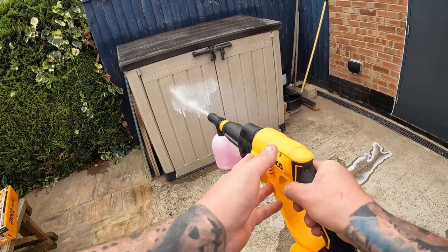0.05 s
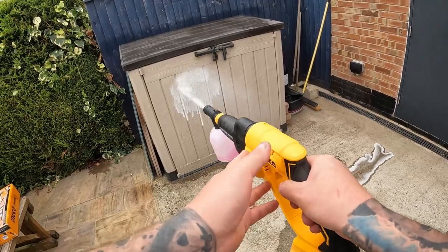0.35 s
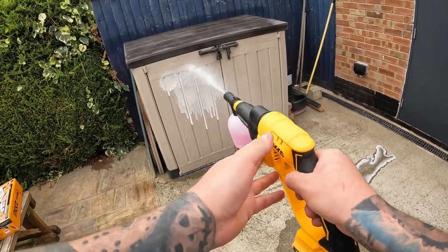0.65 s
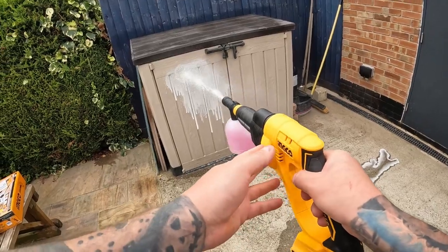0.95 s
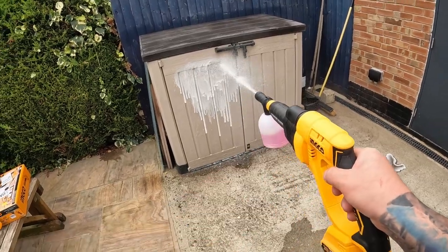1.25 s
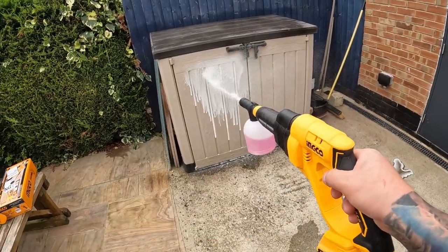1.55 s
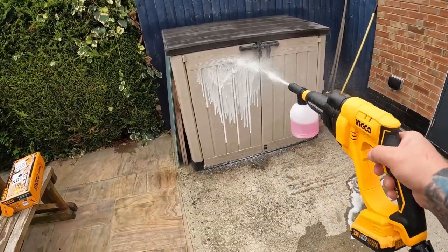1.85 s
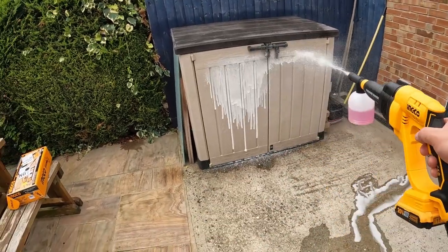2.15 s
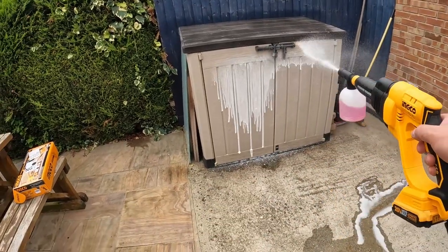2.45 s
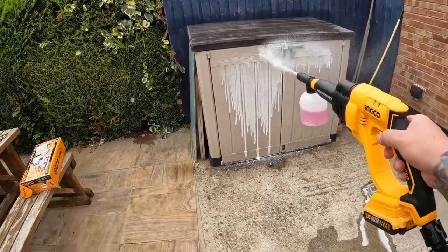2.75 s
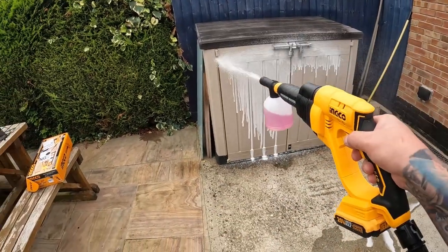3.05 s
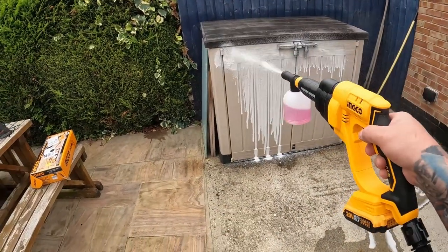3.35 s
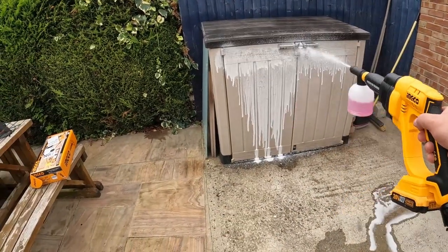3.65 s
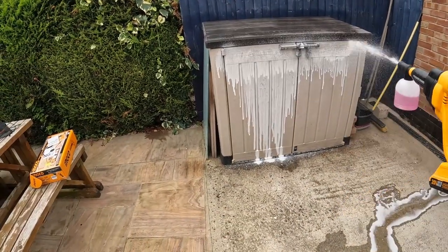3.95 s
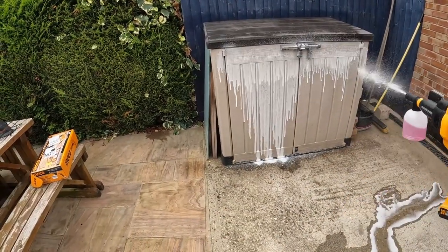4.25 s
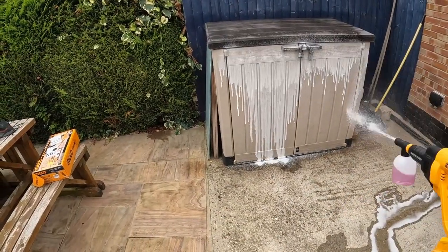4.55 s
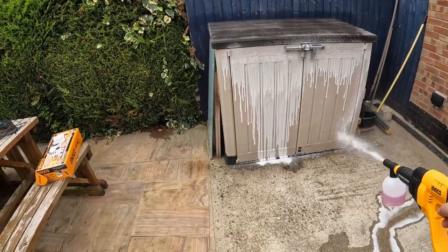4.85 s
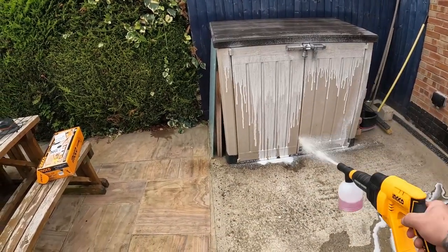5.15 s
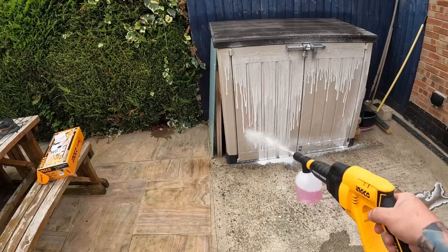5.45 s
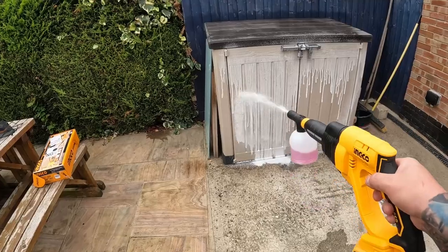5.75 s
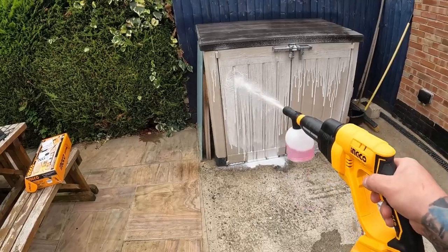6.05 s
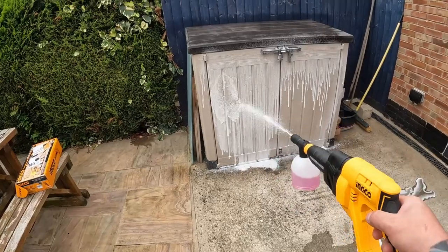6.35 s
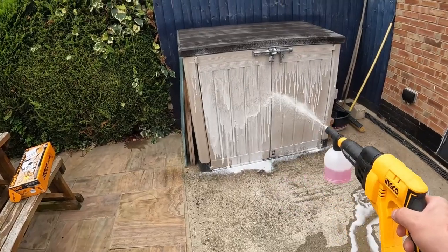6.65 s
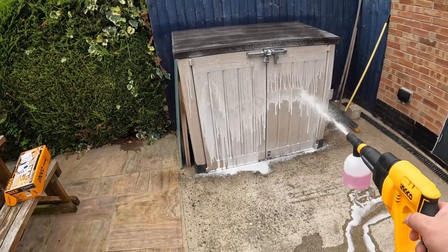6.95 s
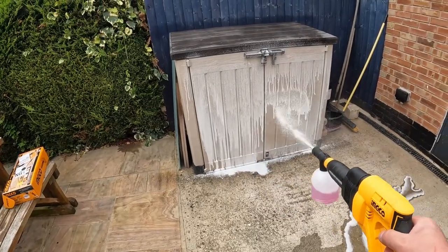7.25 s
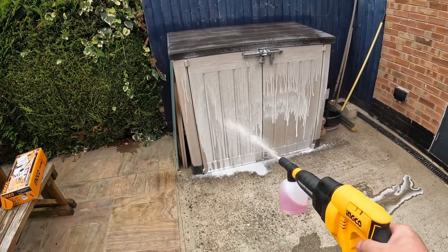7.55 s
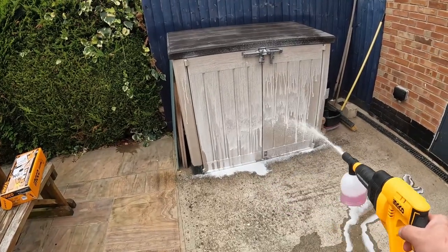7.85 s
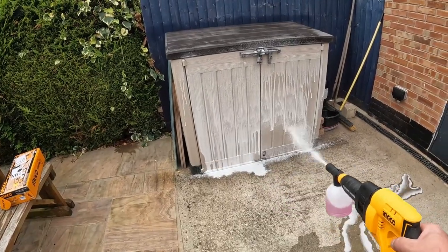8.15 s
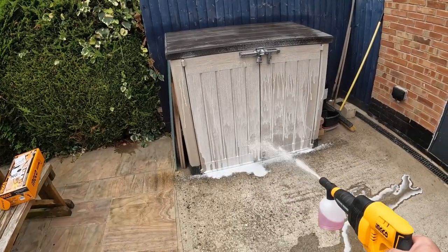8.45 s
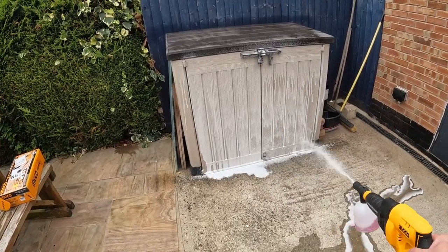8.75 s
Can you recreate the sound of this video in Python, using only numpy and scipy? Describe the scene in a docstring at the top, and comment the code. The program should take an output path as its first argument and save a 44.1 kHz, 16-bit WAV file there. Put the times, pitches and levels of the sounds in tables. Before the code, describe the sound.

A battery-powered pressure washer runs without a break, close to the microphone in a small yard. Its pump makes a fast, rattling buzz under a high gear whine, while the jet hisses and fizzes and drops patter on hollow plastic cabinet doors. The hiss shifts in brightness as the spray sweeps around. Faint wind rumble and a few dull handling thumps sit underneath.

```python
"""Foaming a cabinet with a pressure washer

A cordless pressure washer, held at arm's length, sprays foam on a plastic cabinet in a small yard.
Its piston knocks twice per crank turn, and its gears whine and ring the case. The jet hisses in time
with the strokes and drops patter on the doors. Light wind and a few dull handling thumps reach the
two microphone ports."""
import sys
import numpy as np
from scipy import signal
from scipy.fft import rfft, irfft
from scipy.io import wavfile
from scipy.ndimage import uniform_filter1d

SR = 44100
rng = np.random.default_rng(int(sys.argv[2]) if len(sys.argv) > 2 else 0)


def transcribe(signal):
    """Save signal, clipped to [-1, 1], as a 16-bit WAV file at the path in sys.argv[1]."""
    frames = np.atleast_2d(signal).T
    limited = np.clip(frames, -1, 1)
    pcm = np.round(limited * 32767).astype(np.int16)
    wavfile.write(sys.argv[1], SR, pcm)


N = 397341
TIME = np.arange(N) / SR
FREQS = np.fft.rfftfreq(N, 1 / SR)


def undb(db):
    """Turn decibels into a gain to multiply by."""
    return 10 ** (np.asarray(db) / 20)


def unit(x):
    """Scale a signal to an average strength (rms) of 1."""
    return x / np.sqrt(np.mean(x ** 2))


def over_time(table):
    """Join (time_s, value) points into one value per sample."""
    return np.interp(TIME, *np.transpose(table))


def over_pitch(table):
    """Join (pitch_hz, value) points into one value per frequency."""
    hz, value = np.transpose(table)
    return np.interp(np.log(FREQS + 1), np.log(hz), value)


def filtered(x, response):
    """Turn each frequency up or down by its response."""
    return irfft(rfft(x) * response, N)


def coloured(x, tone):
    """Shape a sound with a (pitch_hz, level_db) table; strength 1."""
    return unit(filtered(x, undb(over_pitch(tone))))


def resonance(freqs, hz, width_hz):
    """How strongly something that rings at hz answers each frequency."""
    return 1j * freqs * width_hz / (hz ** 2 - freqs ** 2 + 1j * freqs * width_hz)


def ringing(x, hz, width_hz):
    """Make x ring at a pitch that can move; strength 1."""
    carrier = np.exp(2j * np.pi * np.cumsum(hz) / SR)
    slow = signal.sosfilt(signal.butter(2, width_hz / 2, fs=SR, output="sos"), x / carrier)
    return unit(np.real(slow * carrier))


def noise():
    """Plain white noise."""
    return rng.standard_normal(N)


def wander(rate_hz):
    """A smooth random wobble of strength 1."""
    return unit(filtered(noise(), 1 / (1 + (FREQS / rate_hz) ** 4)))


def after(time_s, ramp_s=0.34):
    """Go from 0 to 1 around time_s; the usual ramp is one move of the arm."""
    return np.clip((TIME - time_s) / ramp_s + .5, 0, 1)


def bump(middle_s, half_s):
    """A smooth rise and fall, 1 at its middle."""
    return np.exp(-.5 * ((TIME - middle_s) / half_s) ** 2)


def swells(table, column=0):
    """Add up brief level changes in dB; column 0 is the table's first gain."""
    return sum(gains_db[column] * bump(middle_s, half_s) for middle_s, half_s, *gains_db in table)


def strokes(turn, place):
    """Swing between 1 and -1 twice per crank turn, peaking at place (0 to 1)."""
    return np.cos(4 * np.pi * (turn - place))


def piston_load(turn, place, stroke_db=9.0, forward_db=1.0):
    """The load peaks twice a turn; forward_db lifts the second peak and lowers the first."""
    return unit(undb(stroke_db * strokes(turn, place) - forward_db * np.cos(2 * np.pi * (turn - place))))


def blows(turn, places, forces, scatter_db, jitter_s):
    """Taps that come back at the same places in every turn, no two quite alike."""
    out, turns = np.zeros(N), np.arange(int(turn[-1]))
    late, size = rng.standard_normal((2, len(places), len(turns)))
    due_s = np.interp(turns + places[:, None], turn, TIME)
    at = np.clip((due_s + jitter_s * late) * SR, 0, N - 2)
    gain = forces[:, None] * undb(scatter_db * size)
    # each tap is shared between the two nearest samples
    np.add.at(out, at.astype(int), gain * (1 - at % 1))
    np.add.at(out, at.astype(int) + 1, gain * (at % 1))
    return out


def rattle(turn, count=132):
    """Gear teeth and seals tick in a pattern that repeats every turn."""
    places = (np.arange(count) + rng.random(count)) / count
    return unit(blows(turn, places, rng.choice([-1, 1], count), scatter_db=2, jitter_s=7e-6))


def drops(spread_db=4.0):
    """A dense stream of tiny impacts of uneven size."""
    return noise() * undb(spread_db * np.clip(noise(), -2, 2))


# Tone of the yard: pitch_hz, level_db
YARD_TONE = [(20, -12), (70, 7), (130, -7), (300, 2.5), (700, -28), (3000, -37)]

def yard():
    """A faint, steady outdoor rumble."""
    return undb(-58) * coloured(noise(), YARD_TONE)


# Low gusts of wind and short, dull handling thumps: middle_s, half_length_s, level_db
GUSTS_AND_THUMPS = [(0.115, 0.045, -51), (0.315, 0.018, -41.5), (0.872, 0.015, -35), (0.99, 0.32, -52),
                    (1.5, 0.1, -43.5), (1.76, 0.017, -28), (1.79, 0.028, -34), (2.248, .03, -47),
                    (4.516, 0.078, -52.5), (5.45, 0.055, -43.5), (5.897, 0.022, -38.5), (5.98, .05, -45),
                    (6.6, 0.26, -62), (7.3, 0.057, -55), (8.8, 0.34, -49)]
# Tones of the wind and of the thumps: pitch_hz, level_db
WIND_TONE = [(10, -3.5), (25, 1), (45, -1.5), (80, -7), (150, -31), (400, -48)]
THUMP_TONE = [(20, -10), (65, 7), (150, -6), (300, -34), (800, -50)]

def wind_and_thumps(breeze_db=-64.5, thump_half_s=0.017):
    """Wind rumbles on both microphone ports, partly alike, and handling adds short, dull thumps."""
    wind_gain, thump_gain = undb(breeze_db + wander(6)), 0
    for middle_s, half_s, db in GUSTS_AND_THUMPS:
        swell = undb(db) * bump(middle_s, half_s)
        thump_share = 1 / (1 + (half_s / thump_half_s) ** 4)  # larger for shorter events
        wind_gain = wind_gain + (1 - thump_share) * swell
        thump_gain = thump_gain + thump_share * swell
    shared = coloured(noise(), WIND_TONE)
    rumble = np.array([shared + 0.64 * coloured(noise(), WIND_TONE) for _ in range(2)])
    return wind_gain * rumble + thump_gain * coloured(noise(), THUMP_TONE)


# Where the jet points: time_s, height (0 foot of the doors, 1 top)
AIM = [(0.0, 0.66), (1.3, 0.79), (2.0, 0.86), (2.45, 0.74), (3.2, 0.96), (4.1, 0.65), (5.35, 0.17),
       (5.9, 0.74), (6.9, 0.6), (7.3, 0.39), (7.7, 0.45), (8.05, 0.27), (8.45, 0.23), (8.85, 0.34)]

def aim_height():
    """The jet sweeps up and down the doors."""
    return over_time(AIM)


HAND_OFF_S = 1.17

def hand_on():
    """1 while a second hand steadies the housing, then 0."""
    return 1 - after(HAND_OFF_S, ramp_s=0.093)


# The jet slips off the doors onto the paving: start_s, end_s
MISSES = [(4.55, 5.4), (8.62, 11)]
SECOND_COAT_S, ASIDE_START_S, ASIDE_END_S = 5.4, 3.75, 4.52

def level(db, high_db=0, hand_db=0, foam_db=0, miss_db=0, aside_db=0):
    """A layer's level in dB, plus what each way of holding and aiming the gun adds."""
    on_foam = after(SECOND_COAT_S)  # the jet runs back over its own foam
    missing = sum(after(start_s) - after(end_s) for start_s, end_s in MISSES)
    aside = after(ASIDE_START_S) - after(ASIDE_END_S)  # the gun is held out to the side
    return (db + high_db * aim_height() + hand_db * hand_on()
            + foam_db * on_foam + miss_db * missing + aside_db * aside)


# The jet finds a loose spot on a door: middle_s, half_length_s, gain_db
LOOSE_SPOTS = [(2.6, 0.37, 2), (7.05, .07, 3.5), (7.65, 0.12, 5), (8.42, 0.13, 6)]

def doors(turn, pitch_hz=915, width_hz=105):
    """Each slug of water thumps the hollow plastic doors."""
    drum_db = level(-43.5, hand_db=-2.5, foam_db=-1) + swells(LOOSE_SPOTS)
    slugs = noise() * undb(1.1 * strokes(turn, place=0.17))
    return undb(drum_db) * unit(filtered(slugs, resonance(FREQS, pitch_hz, width_hz) ** 2))


# Tones of the bright wash and the lower splash: pitch_hz, level_db
WASH_TONE = [(3500, -27), (4600, -10), (4950, 2), (5900, 1), (7000, -19), (9000, -37)]
SPLASH_TONE = [(400, -5), (1200, -4), (2200, 8), (2600, -2), (3200, -2.5), (3850, 7), (4400, -5.5),
               (6000, -15)]

def patter(surge_db):
    """Drops land as a pulsing wash and an even splash."""
    wash_db = level(-53, high_db=10, hand_db=-2, foam_db=-2, miss_db=3.5)
    splash_db = level(-41.5, high_db=-8, hand_db=-1, miss_db=3, aside_db=-1)
    wash = coloured(drops() * undb(surge_db), WASH_TONE)
    splash = coloured(drops(), SPLASH_TONE)
    return undb(wash_db) * wash + undb(splash_db) * splash


# Tone of the mist: pitch_hz, level_db
MIST_TONE = [(2000, -8), (3700, -5), (4400, -15.5), (7900, 1), (8900, -6.5), (10300, 1.5), (10900, -6),
             (11300, -0.5), (11800, -8), (12700, -6.5), (13800, -10.5), (15000, -37), (16000, -29)]
# The finest hiss swells: middle_s, half_length_s, gain_db
MIST_SWELLS = [(1.3, 0.17, 2.5), (7.0, 0.064, 2)]

def mist(turn, splutter):
    """The finest drops mingle with the ticking of the pump."""
    mist_db = level(-42, high_db=-0.5, hand_db=1.5, foam_db=1.5, miss_db=-1) + swells(MIST_SWELLS)
    puff_db = 2 * strokes(turn, place=0.26) + 2 * np.cos(2 * np.pi * (turn - .85)) + 1.7 * splutter
    ticks = unit(drops(spread_db=6.8)) + undb(1.5) * rattle(turn)
    return undb(mist_db) * coloured(ticks * undb(puff_db), MIST_TONE)


# Tone of the nozzle: pitch_hz, level_db
NOZZLE_TONE = [(3000, -38), (5500, -27), (6100, 7), (6520, 11), (6950, 5.5), (7500, -10), (8600, -28),
               (11000, -49)]
# The jet hits squarely and the slot's sizzle stands out: middle_s, half_length_s, gain_db
SQUARE_HITS = [(1.55, .25, 2), (3.25, 0.17, 1), (5.9, .15, 2)]
# The jet crosses ribs and wet patches: middle_s, half_length_s, nozzle_db, fizz_db
PATCHES = [(.09, 0.023, -2, 5), (.21, .03, 2, 7), (.32, 0.052, -3, -2), (.52, 0.085, 1, 0),
           (.7, 0.02, -6, -7), (2.1, 0.052, 0, -1), (2.45, 0.057, -2, -1), (5.75, 0.056, 1.5, 2),
           (6.35, .1, -1, 3.5), (7.0, 0.11, 4, -6), (7.45, 0.43, -3, 3.5), (7.95, 0.056, 0, -3),
           (8.42, 0.042, -2, 2.5), (8.8, 0.17, -11, -1.5)]

def nozzle(turn, surge_db, slot_hz=6540, slot_width_hz=200):
    """The jet hisses out of the nozzle, whose slot rings at the peak of each stroke."""
    nozzle_db = level(-50, high_db=16, foam_db=2.5, miss_db=3) + swells(PATCHES)
    jet = coloured(drops() * undb(surge_db), NOZZLE_TONE)
    ring = filtered(noise(), resonance(FREQS, slot_hz, slot_width_hz))
    slot = unit(ring * piston_load(turn, .42, stroke_db=7, forward_db=-1.5))
    return undb(nozzle_db) * (undb(-2) * jet + undb(-5.5 + swells(SQUARE_HITS)) * slot)


# Tone of the fizz: pitch_hz, level_db
FIZZ_TONE = [(5900, -12.5), (6500, 0), (7200, 7.5), (8100, -2), (8550, -14), (10000, -43)]

def fizz(surge_db):
    """The foamy jet gives a high, fluttering fizz."""
    fizz_db = level(-43.5, high_db=1, foam_db=-1, miss_db=-7, aside_db=-2) + swells(PATCHES, column=1)
    return undb(fizz_db) * coloured(drops() * undb(0.76 * surge_db + wander(160)), FIZZ_TONE)


def swish(surge_db, foot_hz=8280, fall_hz=3060):
    """The rush off the doors deepens as the jet climbs, and rises as it comes down."""
    swish_db = level(-52, high_db=7.5, hand_db=-5, miss_db=-6) + swells(PATCHES, column=1)
    pitch_hz = foot_hz - fall_hz * aim_height()
    return undb(swish_db) * ringing(drops() * undb(surge_db), pitch_hz, width_hz=1340)


def spray(turn):
    """The jet surges with each stroke, dips as the piston turns round and splutters with foam."""
    dip_db = -8.5 * np.exp(2.2 * (strokes(turn, place=.15) - 1))
    splutter = wander(310)
    surge_db = -2.5 * strokes(turn, place=1) + dip_db + 1.84 * splutter
    hiss = nozzle(turn, surge_db) + fizz(surge_db)
    return hiss + patter(surge_db) + mist(turn, splutter) + swish(surge_db)


# Brief turns of the wrist: middle_s, half_length_s, whine_db, clack_db, case_db
TWISTS = [(0.09, 0.14, 4, -7, 2), (0.33, 0.084, 0, 1, -8), (0.92, 0.11, 1, 3, 2), (2.48, 0.22, -2, -5, 3),
          (3.33, .13, -1, -1, -15), (5.68, 0.16, 0, 2.5, 1.5), (6.1, 0.12, -3, -0.5, -3),
          (7.6, 0.22, 2, 1, 0), (8.38, 0.086, 3, 1, -4), (8.8, 0.085, -3.5, -2.5, 1.5)]

def twist_db(part):
    """Turning the gun shows the microphone another side, so a part sounds louder or softer."""
    return swells(TWISTS, column=("whine", "clack", "case").index(part))


def gear_tone(turn, per_turn, swing_rad, rough_rad):
    """One gear note: the wheel slows under each stroke and the loose teeth rattle."""
    lag = swing_rad * np.sin(4 * np.pi * (turn - .34))
    return np.sqrt(2) * np.cos(2 * np.pi * per_turn * turn - lag + rough_rad * wander(260))


# Notes of a 44-tooth wheel driven by a six-tooth gear: cycles_per_turn, level_db, swing_rad
WHINE_NOTES = [(44, 0, .1), (46, -.5, .1), (44 * 7 / 6, -7, .2), (44 * 8 / 6, -10, .3), (62, -9, 1.2),
               (74, -8, .9), (132, -13, .8), (176, -5, 1.5)]

def gear_whine(turn):
    """Meshing teeth sing a set of clean notes."""
    whine_db = level(-48.5, hand_db=-4.5, foam_db=1.5, aside_db=2) + twist_db("whine")
    return undb(whine_db) * sum(undb(db) * gear_tone(turn, per_turn, swing, rough_rad=0.19)
                                for per_turn, db, swing in WHINE_NOTES)


# Gear notes heard through the shell: cycles_per_turn, level_db, swing_rad
BUZZ_NOTES = [(81, -12, .9), (87, -1, .3), (88, 0, .9), (90, -6, .1)]

def gear_buzz(turn, gearbox_hz=3285):
    """Under load the teeth buzz roughly, and their chatter rings the gearbox."""
    buzz_db = level(-43, high_db=-10, hand_db=-1, foam_db=1, aside_db=-5) + 0.63 * twist_db("whine")
    notes = sum(undb(db) * gear_tone(turn, per_turn, swing, rough_rad=0.87)
                for per_turn, db, swing in BUZZ_NOTES)
    buzz = notes * piston_load(turn, .28, stroke_db=1, forward_db=4)
    ticks = rattle(turn) * piston_load(turn, .31, stroke_db=4, forward_db=4.5)
    chatter = ringing(ticks, np.full(N, gearbox_hz), width_hz=300)
    return undb(buzz_db) * (.9 * buzz + .55 * chatter)


def gear_overtones(turn, teeth=44):
    """Two high, rough notes of the wheel pulse with the load on the piston."""
    lower_db = level(-54.5, high_db=3.5, hand_db=9.5, foam_db=5.5)
    upper_db = level(-65.5, hand_db=7, foam_db=6.5)
    lower = gear_tone(turn, 5 * teeth, swing_rad=1.9, rough_rad=.9)
    upper = gear_tone(turn, 7 * teeth, swing_rad=2, rough_rad=.9)
    return piston_load(turn, .28) * (undb(lower_db) * lower + undb(upper_db) * upper)


# The ring of the case shifts as the gun is turned: time_s, pitch_hz
CASE_PITCH = [(0.0, 9970), (1.72, 9880), (1.82, 9620), (4.53, 9660), (6.92, 9540), (7.52, 9700),
              (8.6, 9680)]

def case_ring(turn):
    """The ticking teeth make the case ring at a very high pitch."""
    case_db = level(-48, high_db=-1, foam_db=4, miss_db=-2.5) + twist_db("case")
    ticks = rattle(turn) * piston_load(turn, .37)
    return undb(case_db) * ringing(ticks, over_time(CASE_PITCH), width_hz=290)


# Piston and valve knocks in one turn: place (0 to 1), strength_db, extra_thud_db, slap_db, clack_db
KNOCKS = [(.08, 3.2, -18.6, 4, 7), (0.137, 1.2, 7.2, -5, 2), (0.28, -4, -11, -10, -20),
          (.587, 1.7, -2.8, 6, -10), (0.634, -1.8, 7.6, -9, -9), (0.727, -4.5, 0, -14, -8),
          (.794, -14, 20, -12, -10)]
# Notes of the pump body: cycles_per_turn, level_db
THRUM_NOTES = [(1, -27), (2, -7), (3, -11), (4, -19.5), (5, -19.5), (6, -14), (7, -12), (8, -19), (9, -9),
               (10, -11.5), (11, -14), (12, -9.5), (13, -11.5), (14, -14), (15, -9.5), (16, -5.5),
               (17, -36), (18, -1), (19, -6), (20, -10.5), (21, 6), (22, 2), (23, 3), (24, -6.5), (25, 5),
               (26, -12), (27, -8), (28, 5), (29, 0.5), (30, 4), (31, -32), (32, -3.5), (33, 3), (34, -0.5),
               (35, -0.5), (36, -0.5), (37, 0.5), (39, -4), (41, -5)]

def thrum(turn, body_hz=1100, tank_hz=740, thud_hz=600):
    """The knocks shake the pump body and set the timing of its notes, which drift as the gun moves."""
    place, blow_db, thud_db, _, _ = np.transpose(KNOCKS)
    direction = np.sign(place - .5)  # the return stroke pushes the other way
    crank, out = np.exp(2j * np.pi * turn), 0
    for per_turn, db in THRUM_NOTES:
        hz = per_turn * CRANK_SPEED[0][1]
        force = direction * undb(blow_db + thud_db / (1 + (hz / thud_hz) ** 8))
        body = resonance(hz, body_hz, width_hz=700) * resonance(hz, tank_hz, width_hz=330)
        push = np.sum(force * np.exp(-2j * np.pi * per_turn * place)) * body
        drift_db = 1.1 * np.interp(TIME, np.linspace(0, TIME[-1], 20), rng.standard_normal(20))
        out = out + undb(db + drift_db) * np.real(crank ** per_turn * push / abs(push))
    # the notes trade strength while their sum stays even
    even = out / np.sqrt(uniform_filter1d(out ** 2, size=SR // 5))
    return even * undb(.5 * wander(64))


# Tone of water in the valves: pitch_hz, level_db
CHURN_TONE = [(100, -21), (300, -24), (500, -9.5), (700, -2.5), (830, -9), (905, -17), (980, 1),
              (1200, -0.5), (1450, -3), (1750, -7.5), (2250, -3.5), (2550, -7.5), (3300, -11.5),
              (4400, -30)]

def churn(turn, rise_s=0.0003, decay_s=0.00083, steady_flow=0.4):
    """Water rushes through the valves after every knock, taking a moment to build."""
    place, blow_db, *_ = np.transpose(KNOCKS)
    rush = blows(turn, place, undb(blow_db), scatter_db=4, jitter_s=1e-4)
    for lag_s in (decay_s, rise_s):
        rush = signal.lfilter([1], [1, -np.exp(-1 / (lag_s * SR))], rush)
    return coloured(np.tanh(noise()) * (rush / rush.max() + steady_flow), CHURN_TONE)


# Pitches at which the plastic shell rings: pitch_hz, width_hz, level_db
SHELL_RINGS = [(1470, 370, 8.5), (1880, 58, 6), (2210, 520, -1), (2800, 43, 6), (2817, 600, 15.5),
               (3360, 380, -25)]
# Tones of the dull valve slap and the bright piston clack: pitch_hz, level_db
SLAP_TONE = [(700, -28), (1400, -2.5), (1900, 6), (2300, 3.5), (2700, -8), (5000, -3.5)]
CLACK_TONE = [(1000, -43), (2000, -0.5), (2600, 8), (3350, 8), (3600, 8), (4600, -4), (12500, 5)]

def shell_knocks(turn):
    """The hard edges of the knocks ring the shell with a slap and a clack."""
    place, _, _, slaps_db, clacks_db = np.transpose(KNOCKS)
    slap_db = level(-46, high_db=2, hand_db=-2, foam_db=-1.5, aside_db=2)
    clack_db = level(-44.5, high_db=-8.5, hand_db=-3, foam_db=4, aside_db=-10) + twist_db("clack")
    shell = sum(undb(db) * resonance(FREQS, hz, width) for hz, width, db in SHELL_RINGS)
    # bending waves travel at different speeds, which softens the start of each knock
    bending = 1 - 2 * resonance(FREQS, hz=2100, width_hz=900)
    out = 0
    for db, edges_db, tone in ((slap_db, slaps_db, SLAP_TONE), (clack_db, clacks_db, CLACK_TONE)):
        knocks = blows(turn, place, undb(edges_db) * np.sign(place - .5), scatter_db=.6, jitter_s=9e-6)
        out = out + undb(db) * coloured(filtered(knocks, shell * bending), tone)
    return out


# How the second hand changes the pump's tone: pitch_hz, gain_db
HAND_TONE = [(200, 2.5), (400, 4.5), (700, 1.5), (1000, 1), (1300, 6), (1900, -1), (2400, 5.5), (2900, 7),
             (3400, 4.5), (4000, -1)]

def second_hand(body, palm_hz=3150, fall_hz=1450, palm_db=-50):
    """A hand colours the pump; as it lifts, the hollow under the palm rings and slides down."""
    held = body + hand_on() * filtered(body, undb(over_pitch(HAND_TONE)) - 1)
    slide_hz = palm_hz - fall_hz * after(HAND_OFF_S, ramp_s=.3)
    return held + undb(palm_db) * bump(HAND_OFF_S, half_s=0.1) * ringing(body, slide_hz, width_hz=320)


# Brief rings and dips in the pump's tone as the gun turns or the hand lifts:
# middle_s, half_length_s, pitch_hz, width_hz, gain_db
RINGS_AND_DIPS = [(0.16, 0.32, 870, 66, 3), (3.45, .2, 1030, 54, 2.5), (3, .5, 1230, 240, 2),
                  (5.3, 0.24, 1080, 40, 5.5), (6.3, 0.46, 1220, 42, 3.5), (8.46, 0.15, 1040, 45, 4.5),
                  (8.5, 0.85, 1300, 25, 6), (4.9, .35, 920, 43, 2.5), (7.3, 0.88, 2190, 200, 4.5),
                  (0.74, 0.34, 2730, 430, -0.5), (0.35, 0.044, 3400, 130, 8), (1.1, 0.082, 2200, 200, 4.5),
                  (1.21, 0.049, 3400, 700, -14), (1.6, 0.18, 1700, 250, 5.5), (4.6, 0.36, 2900, 490, -4),
                  (4.17, 0.43, 540, 130, 4), (5.7, 0.28, 1120, 300, 2.5)]

def pump(turn):
    """The piston pump thrums, churns water and knocks on its shell."""
    thrum_db = level(-37, high_db=1.55, hand_db=-3.5, foam_db=-0.5, aside_db=-1)
    thrum_db += 0.14 * twist_db("whine")
    churn_db = level(-41.5, hand_db=-2.5)
    # the forward stroke is the firmer one, most of all under the hand
    accent_db = level(0.41, hand_db=0.5) * np.cos(2 * np.pi * (turn - .11))
    knocks = shell_knocks(turn)
    body = undb(thrum_db) * thrum(turn) + undb(accent_db) * (undb(churn_db) * churn(turn) + knocks)
    for middle_s, half_s, hz, width_hz, db in RINGS_AND_DIPS:
        ring = filtered(body, resonance(FREQS, hz, width_hz))
        body = body + (undb(db) - 1) * bump(middle_s, half_s) * ring
    return second_hand(body)


# Peaks and dips of the housing: pitch_hz, width_hz, gain_db
HOUSING_TONE = [(2290, 170, 3), (2570, 200, -7), (3270, 200, 2), (3590, 200, -6)]

def housing(x):
    """The hollow housing favours some pitches and swallows others."""
    bands = [1 + (undb(db) - 1) * resonance(FREQS, hz, width) for hz, width, db in HOUSING_TONE]
    return filtered(x, np.prod(bands, axis=0))


# How much louder the left port is: pitch_hz, left_minus_right_db
PORT_BALANCE = [(60, 2), (110, -0.5), (200, -0.5), (380, -0.5), (700, -2.5), (1290, -2), (2380, -3.5),
                (4400, -4.5), (8120, 0.5), (15000, -2)]
# How far ahead the left port is: pitch_hz, lead_rad
PORT_LEAD = [(20, 0.66), (500, -0.37), (1000, -0.17), (1500, -0.67), (3900, -1.06), (4900, -0.53),
             (11000, 0.043), (14000, 0.89)]
# Strength of the scattered sound: pitch_hz, level_db
ECHO_TONE = [(100, -12), (600, -19), (1200, -15), (2300, -10), (4200, -11), (6500, -18), (9500, -16),
             (12500, -3)]

def microphone_ports(x, echo_decay_s=0.76):
    """Each port hears its own tone and delay; walls and paving scatter sound between them."""
    lean = undb(over_pitch(PORT_BALANCE) / 2) * np.exp(.5j * over_pitch(PORT_LEAD))
    echoes = rfft(noise() * np.exp(-TIME / echo_decay_s))
    side = echoes / np.std(echoes) * undb(over_pitch(ECHO_TONE))
    return np.array([filtered(x, lean + side), filtered(x, 1 / lean - side)])


# The crank slows as the battery sags: time_s, turns_per_s
CRANK_SPEED = [(0.0, 37.61), (1.0, 37.41), (3.0, 37.265), (3.6, 37.172), (6.6, 37.172), (9.0, 37.0)]

def scene():
    """One crank drives the pump, the gears and the jet."""
    turn = np.cumsum(over_time(CRANK_SPEED)) / SR  # crank turns so far
    background = yard()
    machine = pump(turn) + gear_whine(turn) + gear_buzz(turn) + gear_overtones(turn) + case_ring(turn)
    mix = housing(machine) + spray(turn) + doors(turn) + background
    return microphone_ports(mix) + wind_and_thumps()


def record(dry):
    """Cut away the very highest treble."""
    top_hz = 15500
    return signal.sosfilt(signal.ellip(10, .2, 80, top_hz, fs=SR, output="sos"), dry)


dry = scene()
out = record(dry)
transcribe(out)
```